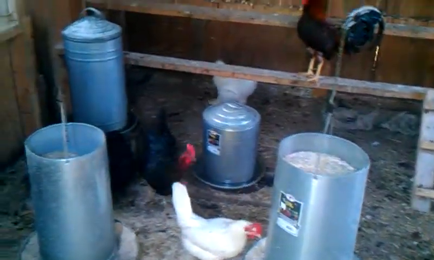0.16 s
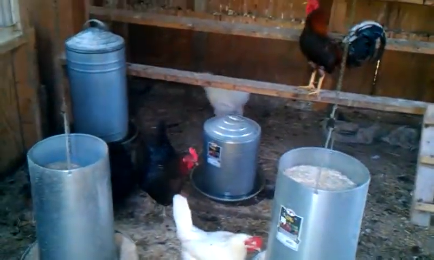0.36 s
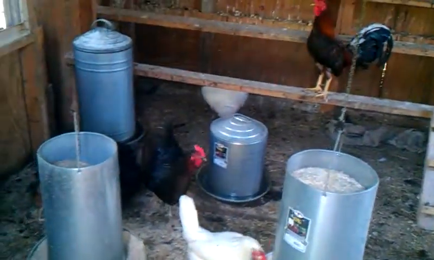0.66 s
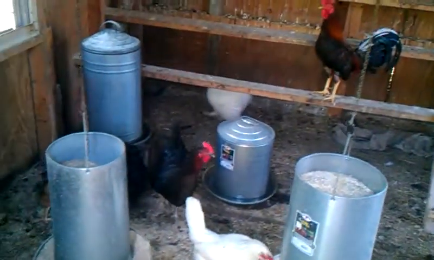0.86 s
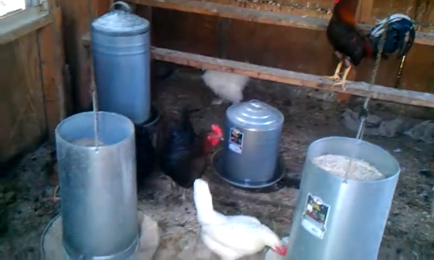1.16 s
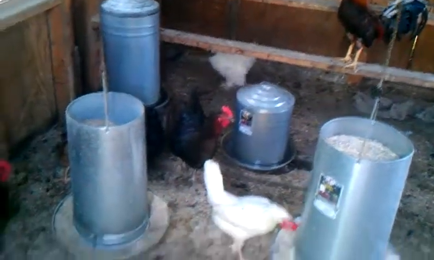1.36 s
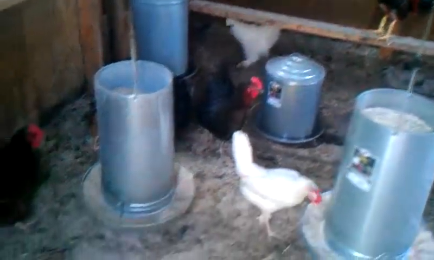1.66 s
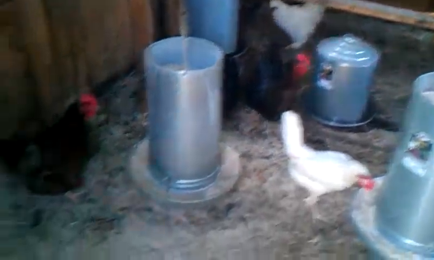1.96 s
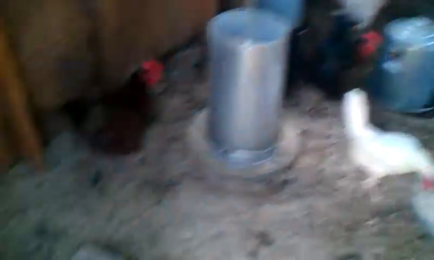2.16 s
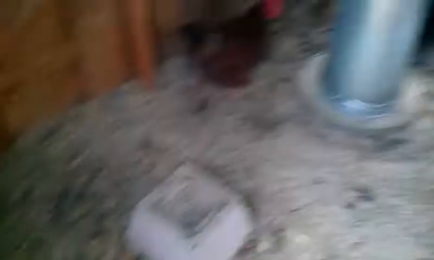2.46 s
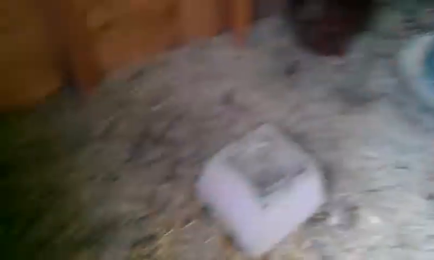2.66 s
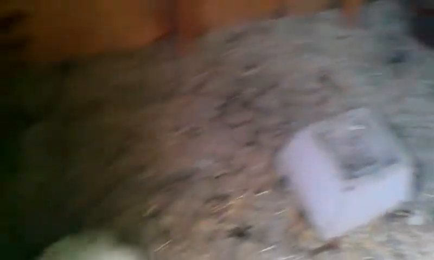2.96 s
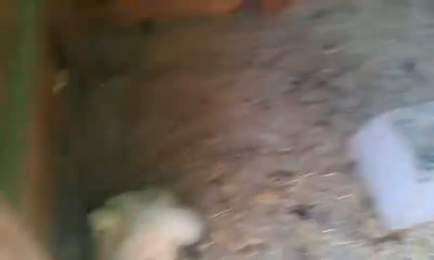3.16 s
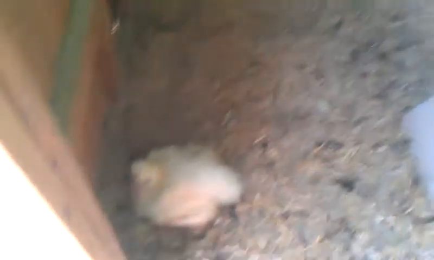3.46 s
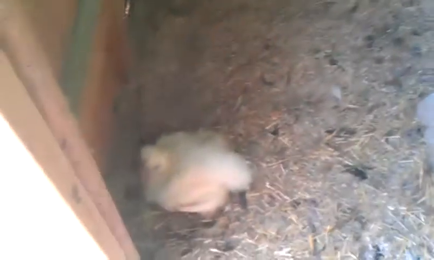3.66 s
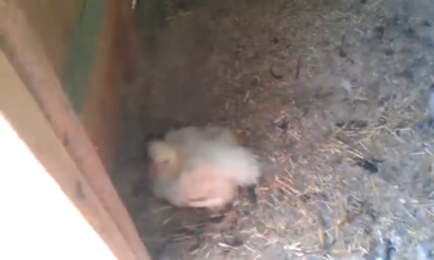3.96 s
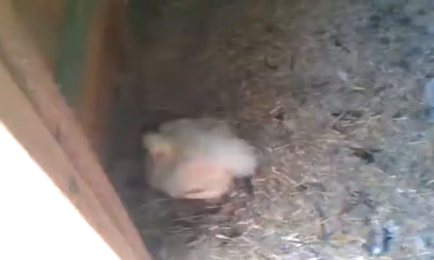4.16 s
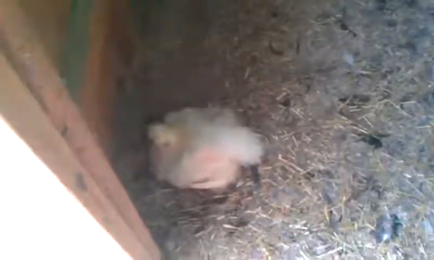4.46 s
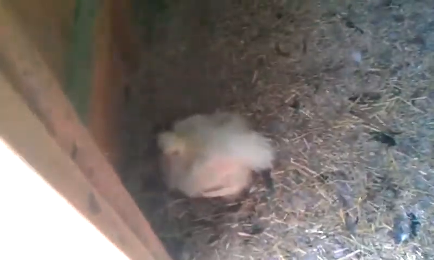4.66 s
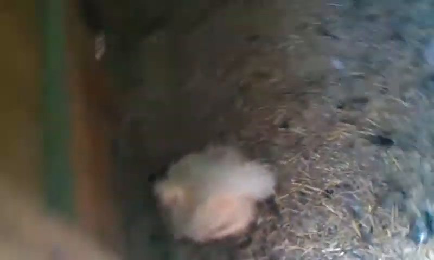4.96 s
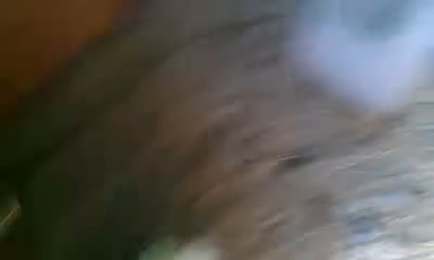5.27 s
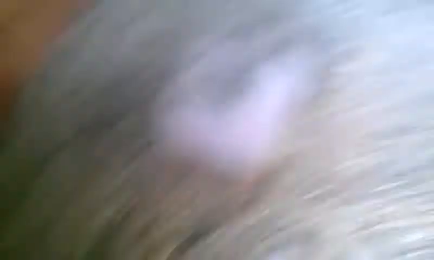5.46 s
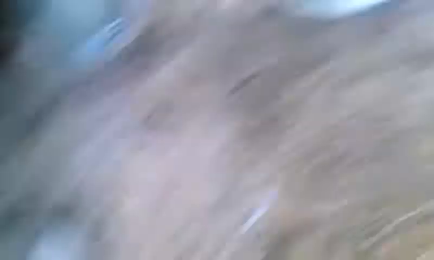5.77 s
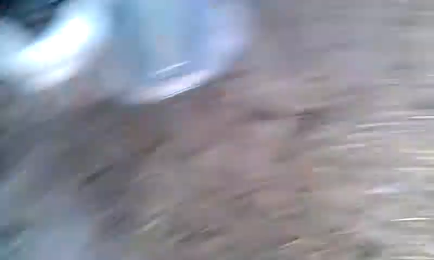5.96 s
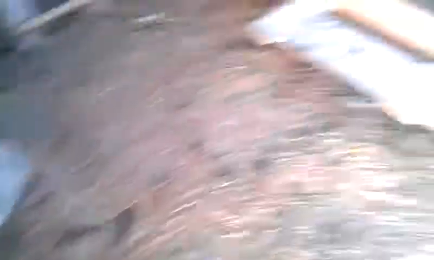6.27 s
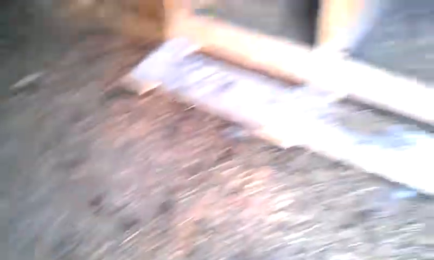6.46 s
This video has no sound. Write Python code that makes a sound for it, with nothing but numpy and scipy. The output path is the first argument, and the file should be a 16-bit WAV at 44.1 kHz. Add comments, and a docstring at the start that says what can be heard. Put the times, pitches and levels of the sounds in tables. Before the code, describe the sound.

Chickens cluck softly in a small wooden coop, then in a louder steady run, ending with loud squawks over a faint high hiss.

```python
"""Inside a small wooden coop: soft scattered clucks, a steady louder run, then three loud alarm notes.
Each cluck is a rough burst of a chicken's syrinx that closes into a low hum; close plank walls throw it
back at the microphone. A high hiss, like insects outside, swells once over low outdoor air.
Soft breathy noise comes and goes, a thin whistle passes, feet scuff straw, and handling bumps faintly."""
import sys
import numpy as np
from scipy import signal
from scipy.fft import rfft, irfft
from scipy.io import wavfile
from scipy.ndimage import uniform_filter1d, map_coordinates

SR = 44100
rng = np.random.default_rng(int(sys.argv[2]) if len(sys.argv) > 2 else 0)


def master(y):
    """Save y as 16-bit WAV."""
    cut = np.clip(np.atleast_2d(y).T, -1, 1)
    pcm = np.round(cut * 32767)  # scale
    wavfile.write(sys.argv[1], SR, pcm.astype(np.int16))


N = 291501
TIME = np.arange(N) / SR
BAND_LIMIT_HZ = 15950


def gain_of(db):
    """Decibels to amplitude."""
    return 10 ** (np.asarray(db) / 20)


def unit_rms(x):
    """Scales to rms 1."""
    return x / np.sqrt(np.mean(x ** 2) + 1e-20)


def curve_at(points, hz):
    """Reads a table on a log-frequency axis."""
    f, value = np.transpose(points)
    return np.interp(np.log(hz + 1), np.log(f + 1), value)


def add(mix, start, sound):
    """Adds a sound to the mix at start seconds."""
    part = mix[round(start * SR):][:len(sound)]
    part += sound[:len(part)]


def noise(colour, size):
    """Noise of rms 1 with a given spectral shape."""
    hz = np.fft.rfftfreq(size, 1 / SR)
    return unit_rms(irfft(rfft(rng.standard_normal(size)) * gain_of(curve_at(colour, hz)), size))


def rise_and_fall(start, rise, fall, curve):
    """A gain that climbs from silence to 1 and sinks back; times in seconds."""
    return np.interp(TIME, [start, start + rise, start + rise + fall], [0, 1, 0]) ** curve


def outdoor_air():
    """Low, steady air from outside the coop."""
    # spectrum of the air (frequency [Hz], level [dB])
    colour = [(20, -4), (60, -5), (150, -4), (400, -2), (800, -6.5), (1600, -11), (3500, -18), (4500, -21),
              (6000, -21), (9000, -79)]
    return gain_of(-63.5) * noise(colour, N)


def high_hiss():
    """A high hiss like insects outside; it and its one swell flicker together."""
    # spectrum of the hiss (frequency [Hz], level [dB])
    colour = [(4500, -33), (6000, -20.5), (6600, -17), (7000, -9), (7300, -2.5), (8250, 1.5), (9000, -3.5),
              (10000, -7), (11000, -13), (12200, -17.5), (14000, -21), (15800, -25)]
    # its slow drift in loudness (time [s], level [dB])
    levels = [(0, -42), (1.55, -41), (1.95, -43.5), (2.4, -42), (4.2, -41.5)]
    flicker_hz, flicker_db = 22, 0.68
    flicker = unit_rms(signal.lfilter(*signal.butter(2, flicker_hz, fs=SR), rng.standard_normal(N)))
    hiss = noise(colour, N) * gain_of(np.interp(TIME, *np.transpose(levels)))
    return (hiss + shrill_swell()) * gain_of(flicker_db * flicker)


def breathy_swell(start, length, level_db):
    """A soft, low, breathy noise that comes and goes in one arch."""
    # spectrum of the breathy noise (frequency [Hz], level [dB])
    colour = [(20, -3), (150, -7.5), (420, 2), (900, -11), (1600, -15.5), (2800, -13.5), (3650, -8),
              (4300, -29), (5300, -5), (6500, -25), (9000, -18)]
    arch = np.sin(np.pi * np.clip((TIME - start) / length, 0, 1))
    return 0, gain_of(level_db) * noise(colour, N) * arch


def syrinx(hz, rough, jitter, alternation=0):
    """The bird's voice source: uneven pulses, a puff of air each cycle, optionally strong-weak in turn."""
    wobble = unit_rms(uniform_filter1d(rng.standard_normal(len(hz)), size=130))
    turns = np.cumsum(hz * (1 + jitter * rough * wobble)) / SR
    harmonics = np.arange(1, int(BAND_LIMIT_HZ / hz.max()))[:, None]
    pulses = np.cos(2 * np.pi * harmonics * turns).sum(0)
    pulses *= 1 + alternation * np.cos(np.pi * turns)
    puffs = (.3 + np.exp(-(turns % 1) / .25)) * rng.standard_normal(len(hz))
    return (1 - rough) * unit_rms(pulses) + rough * unit_rms(puffs)


def colour_voice(x, colour, peak_hz, peak_db, db_per_octave, width_hz, rings=()):
    """Applies the throat's colour, a beak resonance, a tilt set by effort and any narrow ringing peaks."""
    hz = np.fft.rfftfreq(len(x), 1 / SR)
    peaks = [(peak_hz, width_hz, peak_db), *rings]
    resonances = sum(db / (1 + (2 * (hz - f) / width) ** 2) for f, width, db in peaks)
    tilt = db_per_octave * np.log2(np.clip(hz, 400, 6000) / peak_hz)
    return unit_rms(irfft(rfft(x) * gain_of(curve_at(colour, hz) + resonances + tilt), len(x)))


def coop(x, wet_db):
    """The microphone hears the source, close plank echoes and a tail that differs from spot to spot."""
    # ring of the coop (frequency [Hz], time to fall 60 dB [s])
    ring_times = [(200, 0.29), (600, 0.35), (1300, 0.29), (3000, 0.28), (8000, 0.19)]
    # first echoes off the planks (delay [s], gain [ratio])
    echoes = [(.0031, 0.27), (.0067, 0.6), (0.0102, .35), (0.0176, 0.058)]
    taps = rng.choice([-1., 1.], SR // 2) * (rng.random(SR // 2) < .1)
    hz, t, spectrum = signal.stft(taps, SR, nperseg=256)
    decay = gain_of(-60 * t / curve_at(ring_times, hz)[:, None])
    tail = signal.istft(spectrum * decay, SR, nperseg=256)[1]
    tail *= np.minimum(np.arange(len(tail)) / SR / 0.0079, 1)
    response = gain_of(wet_db) * tail / np.linalg.norm(tail)
    response[0] += 1  # direct sound
    for delay, gain in echoes:
        response[round(delay * SR)] += gain
    heard = signal.fftconvolve(x, response)
    return heard * np.linalg.norm(x) / np.linalg.norm(heard)


def cluck(start, level_db, pitch_hz, beak_hz, beak_db):
    """The voice starts softly, the beak opens on a rough burst, then shuts on a nearly pure hum."""
    # throat colour of a cluck (frequency [Hz], level [dB])
    colour = [(140, -46), (210, -8.5), (340, -6.5), (440, -5), (640, 0.5), (850, -3), (1250, 0),
              (1750, -5.5), (2150, -10.5), (2800, -17.5), (3300, -9.5), (4300, -21.5), (5800, -26.5),
              (12000, -38)]
    # a low voice is clearer, a raised one rougher (pitch [Hz], roughness [0-1])
    roughness = [(210, 0.39), (240, 0.55), (340, .52)]
    # a harder cluck builds longer, shuts faster, is brighter and has less hum
    soft_to_loud_db = (-48, -29.5)
    rise = np.interp(level_db, soft_to_loud_db, (0.0094, .021))
    fall = np.interp(level_db, soft_to_loud_db, (0.03, 0.0098))
    db_per_octave = np.interp(level_db, soft_to_loud_db, (-1.3, 0.24))
    hum_db = np.interp(level_db, soft_to_loud_db, (-12, -22))
    lead_s, hum_delay_s, hum_width_s = .025, 0.059, 0.035
    t = np.arange(SR // 4) / SR - lead_s  # the beak opens at t = 0
    hz = pitch_hz * (1 + .015 * np.exp(-abs(t) / .03))
    drive = syrinx(hz, curve_at(roughness, pitch_hz), jitter=0.1296)
    burst = colour_voice(drive, colour, beak_hz, beak_db, db_per_octave, width_hz=230)
    opening = np.clip(t / rise, 0, 1) ** .8 * np.exp(-(np.maximum(t - rise, 0) / fall) ** 1.3)
    murmur = gain_of(-19.5) * np.exp(-(t / 0.033) ** 2)
    # the first pulses slap hardest, so the treble leads
    slap = gain_of(-8) * unit_rms(np.diff(burst, prepend=0)) * (t > 0) * np.exp(-abs(t) / 0.0068)
    phase = 2 * np.pi * np.cumsum(hz) / SR
    hum = np.sin(phase) * np.exp(-((t - hum_delay_s) / hum_width_s) ** 2)
    hum += gain_of(-18) * np.sin(2 * phase) * opening  # its octave sounds only while the beak is open
    voice = coop(burst * (opening + murmur) + slap, wet_db=1)
    voice += gain_of(hum_db) * coop(hum, wet_db=-3.5)
    return start - lead_s, gain_of(level_db) * voice


def whistle(start, length, level_db):
    """A faint, airy squeal: a few bands of noise that slowly sink and fade."""
    # resonances of the whistle (frequency [Hz], width [Hz], level [dB])
    resonances = [(3400, 61, -6), (4620, 780, -5.5), (5560, 430, 0), (6230, 330, -3)]
    sag_per_s, fade_db_per_s, edge_s = .05, 4, .03
    t = np.arange(SR) / SR
    warped_time = np.cumsum(1 - sag_per_s * t) / SR
    squeal = 0
    for hz, width, db in resonances:
        white = rng.standard_normal(SR) + 1j * rng.standard_normal(SR)
        flutter = signal.lfilter(*signal.butter(2, width / 2, fs=SR), white)
        squeal += gain_of(db) * unit_rms((flutter * np.exp(2j * np.pi * hz * warped_time)).real)
    gate = np.clip(np.minimum(t, length - t) / edge_s, 0, 1)
    return start, gain_of(level_db - fade_db_per_s * t) * unit_rms(squeal) * gate


def scuff(start, level_db, decay):
    """Dry straw gives way underfoot in a short clump of crackles."""
    # spectrum of the straw (frequency [Hz], level [dB])
    colour = [(200, -21), (900, 3), (2100, 10), (3400, -12), (4300, 3), (5700, 14.5), (9000, -12),
              (15000, -33)]
    t = np.arange(SR // 3) / SR
    clumps = gain_of(6.8 * unit_rms(uniform_filter1d(rng.standard_normal(len(t)), size=120)))
    crackle = unit_rms(noise(colour, len(t)) * clumps)
    press = np.minimum(t / .012, 1) * np.exp(-t / decay)
    return start, gain_of(level_db) * coop(crackle * press, wet_db=-13)


def shrill_swell():
    """A shrill band grows over the hiss, climbs in pitch and turns fizzier as it fades."""
    # spectrum of the band midway through its climb (frequency [Hz], level [dB])
    shrill_colour = [(5000, -106), (6500, -24), (7500, 4.5), (8500, 8), (9700, 8), (11000, 2),
                     (13000, -7.5), (15800, -13)]
    # spectrum of its fizzy top (frequency [Hz], level [dB])
    fizz_colour = [(8000, -38), (10500, -14), (12000, 7), (14000, -3), (15800, 4)]
    start, climb_per_s = 4.1, .1
    speed = 1 + climb_per_s * np.clip(TIME - start - .8, -1, 1)
    climbing = map_coordinates(noise(shrill_colour, N), [np.cumsum(speed)], order=3, mode="wrap")
    shrill = gain_of(-35.5) * climbing * rise_and_fall(start, rise=0.91, fall=0.52, curve=0.57)
    fizz = gain_of(-45) * noise(fizz_colour, N) * rise_and_fall(start, rise=1.46, fall=.18, curve=.8)
    return shrill + fizz


def bump(start, level_db, decay):
    """Handling noise right at the microphone: a dull push on the camera body."""
    # spectrum of the thud (frequency [Hz], level [dB])
    colour = [(20, 3), (100, 3), (250, 2.5), (500, -9), (1500, -23), (5000, -60)]
    t = np.arange(SR // 2) / SR
    push = np.minimum(t / 0.0013, 1) * np.exp(-t / decay)
    return start, gain_of(level_db) * noise(colour, len(t)) * push


def alarm(start, level_db, rise, hold, pitch_hz, rough, beak_hz, db_per_octave):
    """A forced, higher note with the beak wide; two run together make the squawk."""
    # throat colour of an alarm note (frequency [Hz], level [dB])
    colour = [(150, -35.5), (350, -14.5), (480, -10), (610, -4.5), (800, -2.5), (1300, -6), (1550, -9.5),
              (2000, -13), (3100, -21.5), (4400, -21), (5200, -32), (7400, -21.5), (8300, -15),
              (10500, -34), (15000, -58)]
    # narrow ringing peaks that colour the alarm notes (frequency [Hz], width [Hz], boost [dB])
    rings = [(606, 46, 4.9), (957, 27, 3.4), (1260, 57, 1.6), (2180, 110, 2.7), (2620, 43, 1.5),
             (3870, 33, 5.6), (8360, 144, 7.1)]
    upper_ring = (3520, 240, 5)
    sag_hz_per_s, beak_db = 180, 6.5
    t = np.arange(SR // 4) / SR
    # the rougher the note, the more its pulses alternate
    drive = syrinx(pitch_hz - sag_hz_per_s * t, rough, jitter=.12, alternation=rough)
    voice = colour_voice(drive, colour, beak_hz, beak_db, db_per_octave, width_hz=370,
                         rings=[*rings, upper_ring])
    fall = 0.0057 + hold  # a note held longer also fades longer
    effort = np.minimum(t / rise, 1) * np.exp(-(np.maximum(t - rise - hold, 0) / fall) ** 1.6)
    return start, gain_of(level_db) * coop(voice * effort, wet_db=0)


def scene():
    """The birds and small noises of the coop over the air outside, at one microphone."""
    # clucks (time [s], level [dB], pitch [Hz], beak resonance [Hz], its boost [dB])
    clucks = [ (.364, -49.5, 290.5, 840, 13), (.540, -49.5, 342, 720, 5), (.709, -45.5, 300, 820, 7),
              (1.845, -47, 286.6, 834, 5), (1.965, -50.5, 344, 750, 5), (2.076, -53.5, 334, 1590, 15),
              (2.206, -50.5, 292, 1600, 10), (2.335, -49, 304, 1600, 8), (2.477, -26.5, 251.5, 1285, 4.5),
              (2.657, -27.5, 231.7, 1380, 7.5), (2.887, -31, 216.7, 1200, 8), (3.173, -33.5, 219, 1200, 1),
              (3.381, -33, 214, 1610, 1), (3.619, -34, 217.6, 1710, 1.5), (3.978, -59.5, 262.5, 885, 10),
              (4.613, -36.5, 216.1, 1770, 4), (4.936, -43.5, 218, 1320, 3), (5.526, -35, 215.8, 1280, 4.5)]
    # alarm notes (time [s], level [dB], rise [s], hold [s], pitch [Hz], roughness [0-1],
    # beak resonance [Hz], brightness [dB per octave])
    alarms = [ (6.144, -20, 0.027, 0.0046, 470.2, .62, 1090, 0.8),
              (6.305, -15, 0.014, 0.0072, 594.8, .7, 840, 2),
              (6.323, -17.5, 0.013, 0.027, 644.1, .33, 2470, 1.5),
              (6.518, -20.5, 0.0097, 0.0097, 388.3, 0.57, 805, -1)]
    # feet scuffing the litter (time [s], level [dB], decay [s])
    scuffs = [(2.23, -49.5, 0.034), (5.244, -47.5, 0.049), (5.329, -57.5, 0.23), (5.624, -50.5, 0.034),
              (5.798, -55.5, 0.1), (5.916, -42, 0.018)]
    # soft handling bumps (time [s], level [dB], decay [s])
    bumps = [(4.329, -58, 0.057), (5.70, -47.5, 0.026), (5.739, -56, 0.083), (6.2, -46, 0.058),
             (6.319, -54, 0.041)]
    # soft, low, breathy swells of noise (time [s], length [s], level [dB])
    swells = [(-.3, 1.0, -62.5), (1.197, 0.62, -61), (4.95, 0.55, -59.5), (5.605, 0.63, -64.5),
              (6.08, 0.47, -52.5)]
    mix = high_hiss() + outdoor_air()
    sources = [(cluck, clucks), (alarm, alarms), (scuff, scuffs), (bump, bumps), (breathy_swell, swells)]
    for source, events in sources:
        for event in events:
            add(mix, *source(*event))
    add(mix, *whistle(start=.755, length=0.49, level_db=-59.5))
    return mix[None]


def record(dry):
    """The microphone rounds off the loudest peaks; a low-pass then trims the highest treble."""
    ceiling = .42
    rounded = ceiling * np.tanh(dry / ceiling)
    lowpass = signal.firwin(511, BAND_LIMIT_HZ, window=("kaiser", 9), fs=SR)
    return signal.oaconvolve(rounded, lowpass[None], "same")


dry = scene()
out = record(dry)
master(out)
```